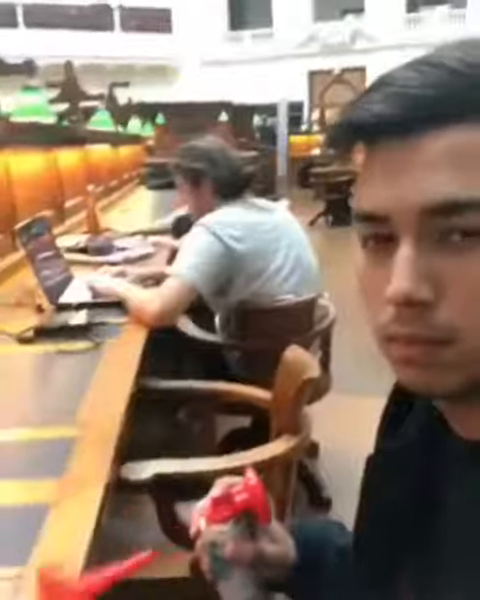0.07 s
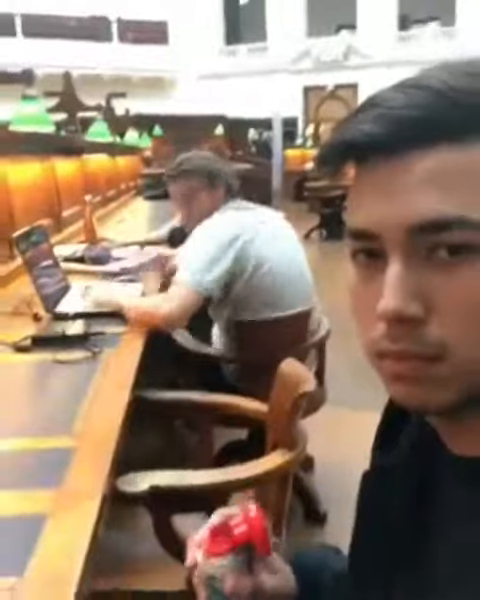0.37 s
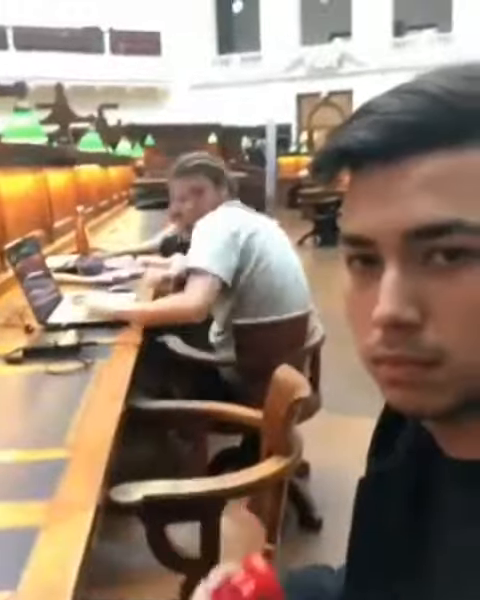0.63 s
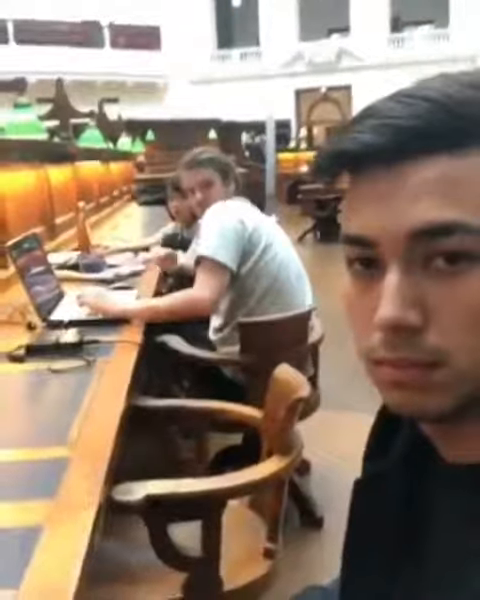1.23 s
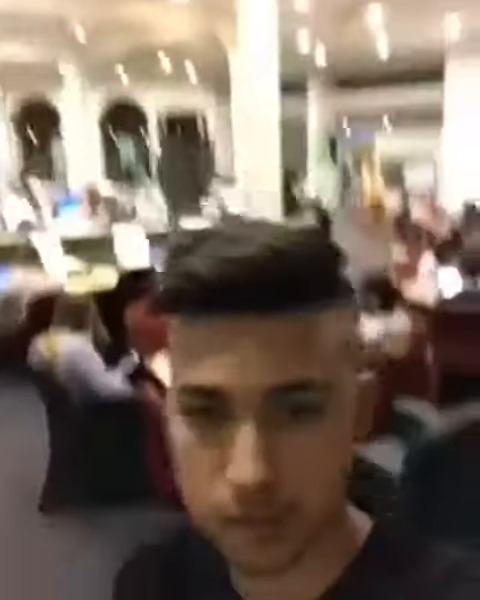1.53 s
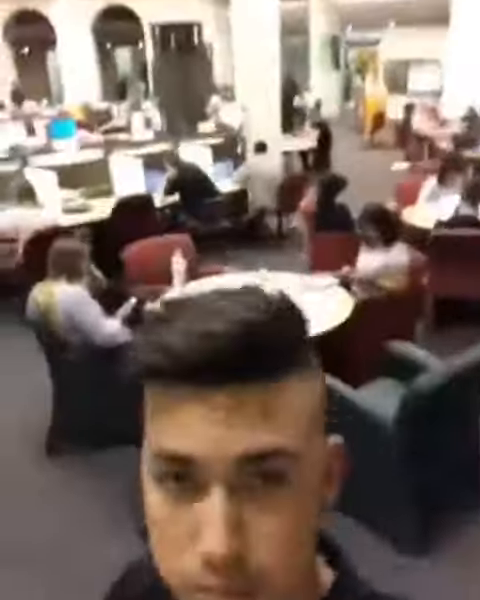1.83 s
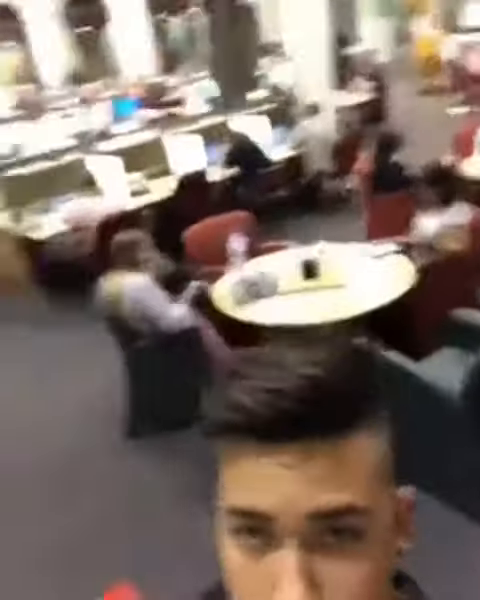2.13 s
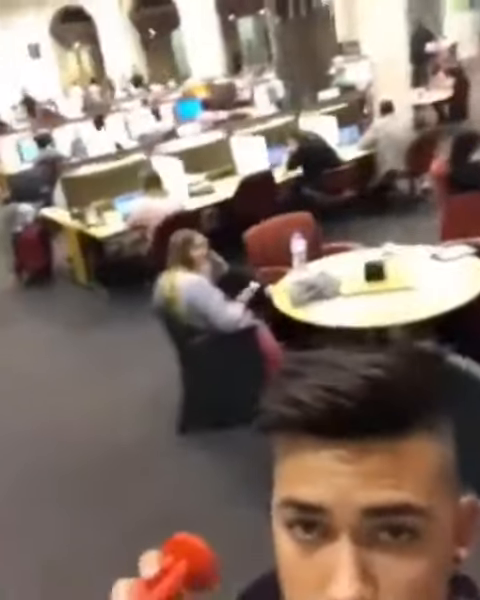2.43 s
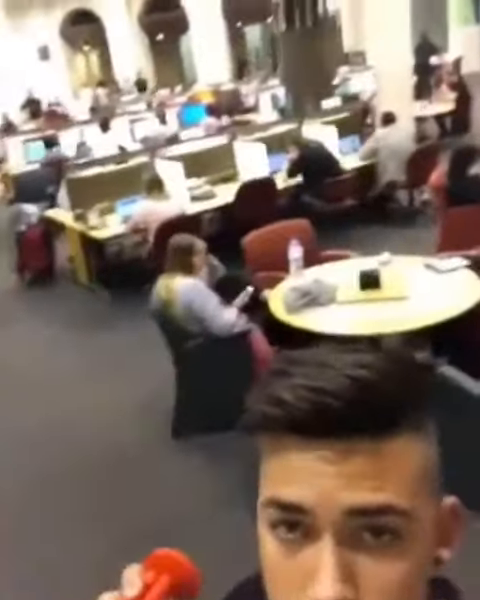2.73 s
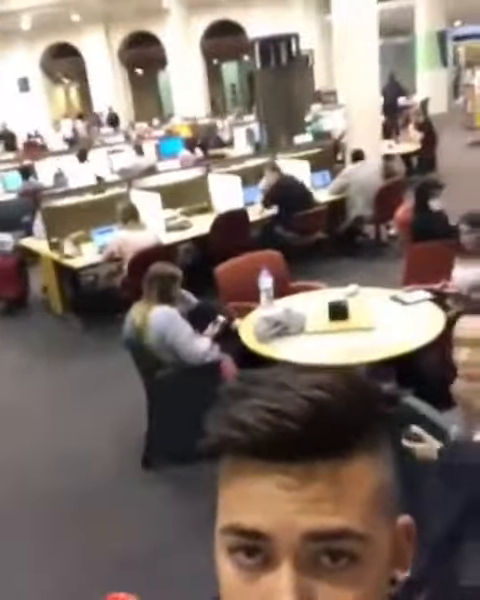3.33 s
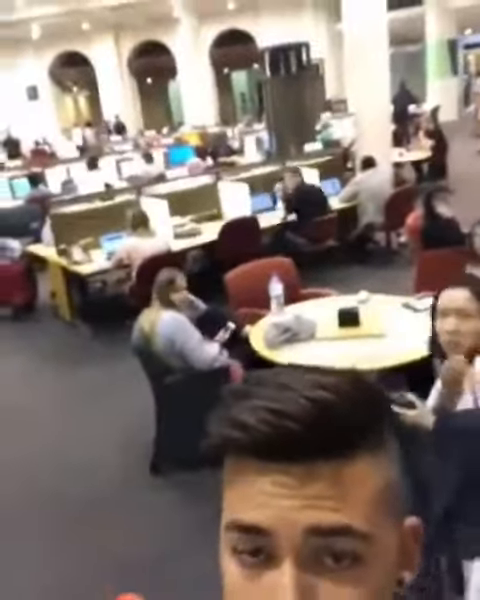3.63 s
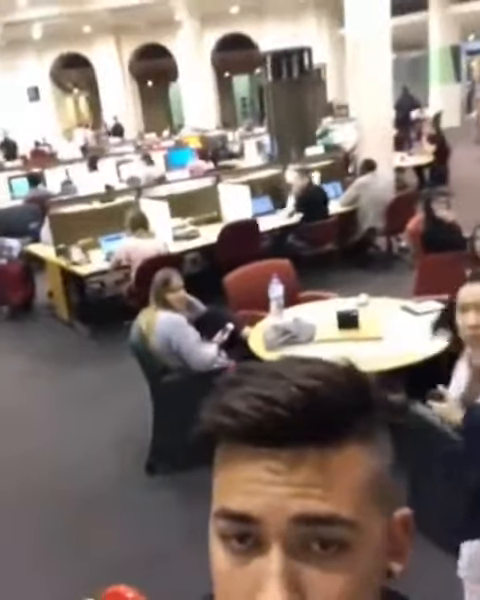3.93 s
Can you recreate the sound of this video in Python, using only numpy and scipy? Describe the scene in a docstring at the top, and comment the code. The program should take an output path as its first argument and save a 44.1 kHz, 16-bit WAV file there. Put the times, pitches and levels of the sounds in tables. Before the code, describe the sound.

Up close, a gas air horn misfires with a brief squeal and a sputtering hiss. Soft rumble and distant furniture knocks follow in a large hall, then the horn blasts fully, starting rough and settling on one note.

```python
"""Air horn in two halls

A handheld gas air horn, fired close to the microphone, once in each of two large halls.
In the first, hushed hall the reed chokes: it jumps to a squeal, then gas only hisses and spits
through the bell. In the second, over low rumble, soft scuffs and distant furniture, the valve
hisses and a full blast starts rough and high, then settles on a clean, steady note."""
import sys
import numpy as np
from scipy import signal
from scipy.fft import rfft, irfft
from scipy.io import wavfile

SR = 44100
rng = np.random.default_rng(int(sys.argv[2]) if len(sys.argv) > 2 else 0)


def transcribe(signal):
    """Save signal, clipped to [-1, 1], as a 16-bit WAV file at the path in sys.argv[1]."""
    frames = np.atleast_2d(signal).T
    limited = np.clip(frames, -1, 1)
    pcm = np.round(limited * 32767).astype(np.int16)
    wavfile.write(sys.argv[1], SR, pcm)


N = 176400
T = np.arange(N) / SR
BAND_LIMIT_HZ = 9650

# Spectrum of gas rushing out of the horn: freq_hz, level_db
RUSH_COLOUR = [(100, -11), (280, -12), (450, 1.5), (650, -2.5), (900, 1.5), (1150, 0), (1700, 2),
               (2300, -2), (4400, -12), (4900, -7), (6500, -9), (8000, -15), (9700, -14)]
# Spectrum of the low puff of wind from the horn: freq_hz, level_db
PUFF_COLOUR = [(20, -5), (55, 7), (110, -7.5), (220, -16), (600, -38.5), (3000, -89.5)]


def amp(db):
    """Decibels to gain."""
    return 10 ** (np.asarray(db) / 20)


def unit_rms(x):
    """Scales to an rms of 1."""
    return x / np.sqrt(np.mean(x ** 2) + 1e-20)


def curve(table, column=1):
    """One column of a time table, joined by straight lines."""
    rows = np.array(table)
    return np.interp(T, rows[:, 0], rows[:, column])


def level(table, column=1):
    """A dB column as gain, silent outside the table's span."""
    return amp(curve(table, column)) * (T >= table[0][0]) * (T <= table[-1][0])


def coloured(x, colour):
    """Filters by a spectrum, keeping the power of white noise."""
    points_hz, db = np.transpose(colour)
    hz = np.fft.rfftfreq(N, 1 / SR)
    gain = amp(np.interp(np.log(hz + 1), np.log(points_hz), db)) * (hz < BAND_LIMIT_HZ)
    return irfft(rfft(x) * unit_rms(gain), N)


def noise(colour):
    """Noise with a given spectrum."""
    return unit_rms(coloured(rng.standard_normal(N), colour))


def band(hz, width_hz):
    """Noise ringing in one resonance; at zero Hz, a random drift."""
    offset = (np.fft.rfftfreq(N, 1 / SR) - hz) / width_hz
    return unit_rms(irfft(rfft(rng.standard_normal(N)) / (1 + offset ** 2 / 2) ** 2, N))


def decay(start_s, fall_s):
    """Sudden onset, exponential fall."""
    return (T >= start_s) * np.exp(-np.maximum(T - start_s, 0) / fall_s)


def soft_hit(start_s, fall_s):
    """Rounded onset, exponential fall."""
    return 2 * (decay(start_s, fall_s) - decay(start_s, fall_s / 3))


def reed(hz, roughness, harmonics, treble_db=0, bloom=1, overdrive=0):
    """Harmonics of a jittering reed; each wavers, the high ones most, as the horn moves in the hand."""
    # Colour the note takes on while overdriven: freq_hz, gain_db
    overdrive_colour = [(350, 12), (600, 3.5), (900, 2.5), (1300, 1.5), (1700, -2), (2400, -3), (3200, 1.5),
                        (4300, 8), (5200, 3.5), (7000, 6.5), (9600, -2)]
    jitter = .04 * roughness * band(0, width_hz=926)
    phase = 2 * np.pi * np.cumsum(hz * (1 + jitter)) / SR
    tone, power = np.zeros(N), np.zeros(N)
    for k, db in harmonics:
        height = np.minimum(k * hz / 4000, 1) ** 2
        waver_db = 4 * height * band(0, width_hz=3.5)
        drive_db = overdrive * np.interp(k * hz, *np.transpose(overdrive_colour))
        gain = amp(db + treble_db * height + drive_db) * bloom ** (k - 1)
        tone -= gain * amp(waver_db) * np.cos(k * phase + .38 * np.sqrt(k) * rng.standard_normal())
        power += gain ** 2 / 2
    return tone / np.sqrt(power)


def blast(start_s, end_s, base_hz, note_db, rush_db, roughness, puff_db):
    """The reed starts sharp and rough in a rush of gas, gains overtones, then settles on its note."""
    # Spectrum of the horn's note: harmonic, level_db
    harmonics = [(1, -9), (2, -12), (3, 0), (4, -13.5), (5, -8), (6, -8), (7, -11), (8, -13.5), (9, -16.5),
                 (10, -19), (11, -18.5), (12, -28), (13, -27), (14, -24), (15, -25), (16, -27), (17, -28),
                 (18, -26), (19, -33), (20, -34), (21, -35), (22, -29), (23, -38), (24, -37)]
    # Treble of the rush, which lasts longer: freq_hz, level_db
    fizz_colour = [(300, -36), (2000, -10.5), (3000, -5), (4600, 1), (7000, -1.5), (8200, -17), (9600, -10)]
    attack_s, release_s, bloom_s, rough_s, overdrive_s, hold_s = .0057, .0062, .021, .075, .27, .61
    overshoot_hz, settle_s, snap_hz, snap_s, creep_hz_per_s = 206.6, .055, 229.5, .0099, 4.1
    age = np.maximum(T - start_s, 0)
    sharp_hz = overshoot_hz * np.exp(-age / settle_s) + snap_hz * np.exp(-age / snap_s)
    hz = base_hz + creep_hz_per_s * age + sharp_hz
    gate = np.clip(age / attack_s, 0, 1) * np.clip((end_s - T) / release_s, 0, 1)
    bloom = np.minimum(age / bloom_s, 1) ** .86
    overdrive = np.exp(-(age / overdrive_s) ** 2)
    treble_db = 7.5 * (.55 - age)
    sag_db = 7 * np.maximum(age - hold_s, 0)  # the can loses pressure
    choke_db = 2 * np.exp(-age / .51)  # rushing gas weakens the note at first
    kick_db = 3 * (1.5 - bloom)  # the reed's first swings are the widest
    note = reed(hz, roughness * np.exp(-age / rough_s), harmonics, treble_db, bloom, overdrive)
    note *= amp(note_db - sag_db - choke_db + kick_db)
    flutter = amp(1.2 * band(0, width_hz=62))
    surge = bloom * np.exp(-(age / .1) ** 2) * flutter
    rush = (surge + amp(-33)) * noise(RUSH_COLOUR)
    fizz = amp(-4) * bloom * np.exp(-(age / .135) ** 2) * noise(fizz_colour)
    puff = bloom * np.exp(-((age - .027) / .022) ** 2) * noise(PUFF_COLOUR)
    return gate * (note + amp(rush_db) * (rush + fizz) + amp(puff_db) * puff)


def hush(end_s=1.42):
    """Faint room tone of the first hall."""
    # Spectrum of the quiet hall: freq_hz, level_db
    colour = [(25, -4.5), (80, 3.5), (200, -0.5), (600, -20.5), (3000, -25), (9000, -38.5)]
    return amp(-74) * (T < end_s) * noise(colour)


def squeal():
    """The choking reed cracks, jumps to a high resonance of the bell and dies."""
    # Course of the overblown reed: time_s, pitch_hz, tone_db, rush_db
    course = [(.066, 1359, -43, -18.5), (.073, 1375, -12.5, -19), (.09, 1343, -12, -32),
              (.102, 1362, -12, -39), (.115, 1328, -12.5, -41.5), (.127, 1365, -11, -46),
              (.14, 1299, -11.5, -41.5), (.152, 1315, -14.5, -43), (.17, 1340, -34.5, -50.5),
              (.2, 1315, -51, -47), (.26, 1330, -60, -84)]
    # Spectrum of the squeal: harmonic, level_db
    harmonics = [(1, -3.5), (2, -14.5), (3, -3), (4, -3.5), (5, -21.5), (6, -35), (7, -31.5)]
    crack_s, crack_width_s, crack_hz = .058, .004, 1685
    crack_gain = amp(-13.5) * np.exp(-((T - crack_s) / crack_width_s) ** 2)
    crack = crack_gain * np.sqrt(2) * np.sin(2 * np.pi * crack_hz * T)
    tone = reed(curve(course), roughness=.2, harmonics=harmonics)
    gas = noise(RUSH_COLOUR) + amp(-17) * noise(PUFF_COLOUR)
    return crack + level(course, column=2) * tone + level(course, column=3) * gas


def leak():
    """Sputtering gas sounds the bell's resonances without moving the reed."""
    # Gas leaking through the silent reed: time_s, bell_db, hiss_db
    flow = [(.15, -56, -64), (.27, -55, -52.5), (.33, -44, -47), (.375, -36, -42.5), (.44, -43, -44.5),
            (.75, -45, -48.5), (1.0, -43, -42.5), (1.065, -39.5, -43.5), (1.09, -39.5, -40.5),
            (1.14, -45, -41.5), (1.2, -43.5, -38), (1.33, -43.5, -42), (1.375, -49, -35.5),
            (1.416, -49, -41), (1.425, -87, -80)]
    # Resonances of the bell: freq_hz, width_hz, level_db
    bell_modes = [(414, 49, -19.5), (1320, 42, -1.5), (2650, 60, -11.5), (4042, 94, -3.5), (5410, 80, -10),
                  (6740, 110, -20)]
    # Spectrum of the broad hiss: freq_hz, level_db
    hiss_colour = [(100, -10), (300, -16.5), (450, 9), (560, -0.5), (720, -8), (870, 3), (1120, -2),
                   (1350, 11), (1750, 1), (2200, -6), (2700, -1.5), (3300, -4), (4400, -2), (6000, -11.5),
                   (7300, -16), (8200, -21.5), (9600, -29)]
    hollow = unit_rms(sum(amp(db) * band(hz, width_hz) for hz, width_hz, db in bell_modes))
    sputter = amp(1.1 * band(0, width_hz=80))
    return sputter * (level(flow) * hollow + level(flow, column=2) * noise(hiss_colour))


def spits(pop_s=.0029, ring_s=.025, ring_db=-17):
    """Drops of propellant spit from the nozzle: sharp pops with a brief ring."""
    # Drops leaving the nozzle: start_s, level_db
    drops = [(0.7851, -16.5), (1.043, -16.5), (1.378, -32)]
    # Colour the bell gives each pop: freq_hz, level_db
    colour = [(150, -22), (450, -19), (900, 1.5), (1650, 9.5), (2000, -0.5), (2500, 9.5), (3200, -9.5),
              (5000, -10.5), (9500, -25)]
    pops = sum(amp(db) * (decay(s, pop_s) + amp(ring_db) * decay(s, ring_s)) for s, db in drops)
    return coloured(pops * rng.standard_normal(N), colour)


def rumble():
    """Low, uneven room tone of the second hall, falling away under the blast."""
    # Spectrum of the rumble: freq_hz, level_db
    colour = [(25, -25.5), (95, -1.5), (150, -5), (220, -0.5), (330, -6), (650, -9), (1100, -13.5),
              (1500, -17.5), (2200, -23.5), (4000, -27), (7500, -34.5), (9600, -44.5)]
    # Its rise and fall: time_s, level_db
    swell = [(1.42, -48.5), (1.52, -51), (1.7, -49.5), (1.88, -52.5), (2.02, -51), (2.25, -52.5),
             (2.45, -54.5), (2.51, -50.5), (2.65, -53), (2.85, -47), (3.05, -66.5), (4, -69)]
    return level(swell) * noise(colour)


def scuffs():
    """Soft, dull scuffs in the second hall."""
    # Each scuff: start_s, level_db, decay_s
    strokes = [(1.429, -45, 0.056), (2.46, -49.5, 0.094)]
    # Spectrum of a scuff: freq_hz, level_db
    colour = [(150, -4.5), (500, 18), (1100, 10.5), (1800, -21), (6000, -54), (9600, -30.5)]
    return sum(amp(db) * soft_hit(s, fall_s) for s, db, fall_s in strokes) * noise(colour)


def furniture():
    """Furniture bumped far from the microphone rings briefly at one low resonance."""
    # Each bump: start_s, pitch_hz, level_db, decay_s
    bumps = [(1.5, 242.3, -51.5, .06), (2.48, 216, -48, 0.0304), (2.68, 122, -48, 0.031),
             (3.255, 135, -58.5, 0.048)]
    thuds = np.zeros(N)
    for start_s, hz, db, fall_s in bumps:
        ring = 2 * np.sin(2 * np.pi * hz * T) + .5 * band(hz, width_hz=80)
        thuds += amp(db) * soft_hit(start_s, fall_s) * ring
    return thuds


def tick():
    """One faint, dry tick in the second hall."""
    return amp(-58) * decay(start_s=1.68, fall_s=.012) * noise(RUSH_COLOUR)


def valve(whistle_hz=2374):
    """A short hiss with a whistle growing in it as the valve opens."""
    # Gas escaping just before the reed speaks: time_s, level_db
    escape = [(2.74, -63.5), (2.77, -46), (2.8, -41.5), (2.84, -29.5), (2.85, -75.5)]
    # Spectrum of the valve's hiss: freq_hz, level_db
    colour = [(200, -36), (1200, -8), (2600, -3.5), (5000, -9.5), (7000, -4.5), (9700, -19.5)]
    flow = level(escape)
    hiss = noise(colour)
    whistle = amp(8) * flow / flow.max() * band(whistle_hz, width_hz=100)
    return flow * (hiss + whistle)


def reverberate(x, near_db=-22, near_decay_s=.008, tail_db=-38, tail_t60_s=1.2):
    """Adds quick reflections from nearby surfaces and the long, faint tail of the hall."""
    t = T[:SR]
    reflections = rng.standard_normal(SR) * (rng.random(SR) < 2500 / SR) * (t > .002)
    near = reflections * np.exp(-t / near_decay_s)
    tail = reflections * np.exp(-np.log(1000) * t / tail_t60_s)
    response = amp(near_db) * near / np.linalg.norm(near) + amp(tail_db) * tail / np.linalg.norm(tail)
    return x + signal.fftconvolve(x, response)[:N]


def scene():
    """The horn up close and the halls behind it, the same in both channels."""
    # Firings of the horn: start_s, end_s, base_hz, note_db, rush_db, roughness, puff_db
    firings = [(-.019, 0.065, 362.7, -15, -20, 0.8, -22.5), (2.837, 4.1, 398.7, -15, -19.5, .4, -20.5)]
    horn = sum(blast(*row) for row in firings) + valve() + squeal() + leak() + spits()
    mix = reverberate(horn) + hush() + rumble() + furniture() + scuffs() + tick()
    return np.tile(mix, (2, 1))


def record(dry):
    """The microphone rounds off the highest peaks; a steep low-pass removes the top treble."""
    rounded = dry / (1 + (abs(dry) / .66) ** 6) ** (1 / 6)
    lowpass = signal.firwin(801, BAND_LIMIT_HZ, window=("kaiser", 9), fs=SR)
    return signal.oaconvolve(rounded, lowpass[None], "same")


dry = scene()
out = record(dry)
transcribe(out)
```